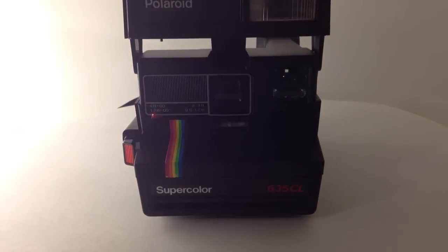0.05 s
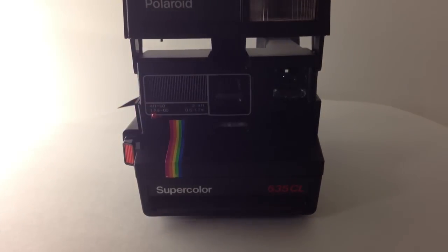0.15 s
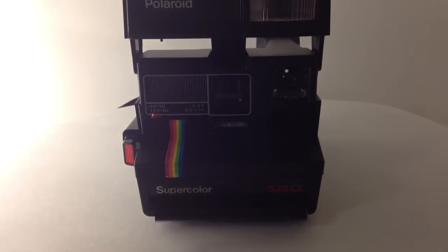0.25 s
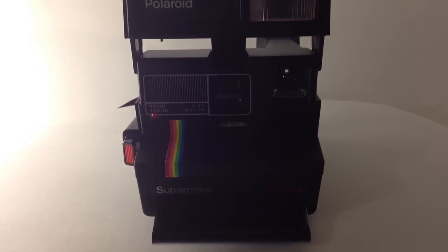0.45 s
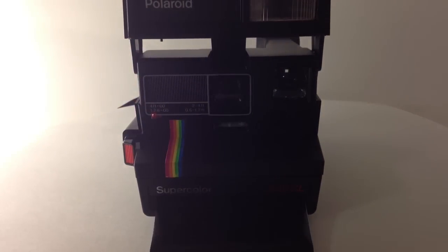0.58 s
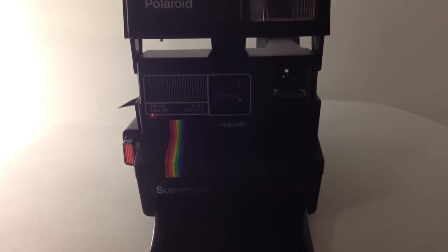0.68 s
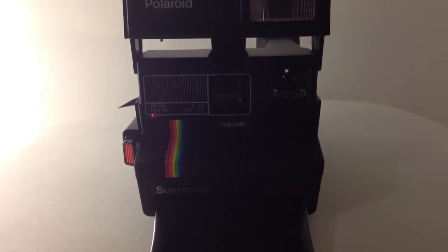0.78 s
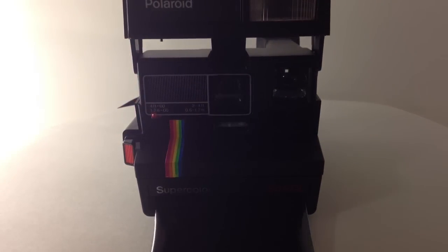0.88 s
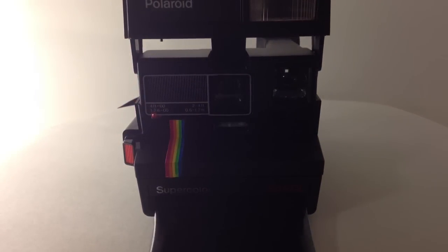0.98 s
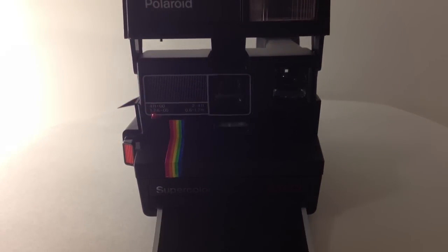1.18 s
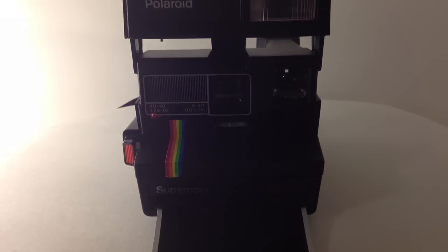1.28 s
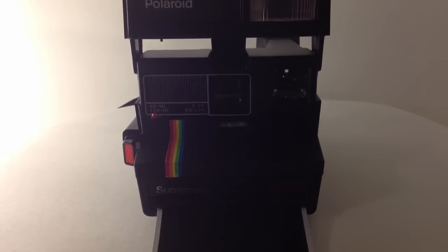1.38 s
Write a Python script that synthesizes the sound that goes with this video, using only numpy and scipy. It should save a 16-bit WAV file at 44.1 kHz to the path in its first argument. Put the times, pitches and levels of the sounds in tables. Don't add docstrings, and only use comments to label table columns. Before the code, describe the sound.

A plastic instant camera's small motor whirs with a gritty, rattling whine as a sheet squeals out through rollers; catches tick, then a sharp hollow clack, and the motor continues more quietly. Close microphone, small quiet room.

```python
import sys
import numpy as np
from scipy import signal
from scipy.fft import rfft, irfft, next_fast_len
from scipy.io import wavfile
from scipy.ndimage import uniform_filter1d, map_coordinates

SR = 44100
rng = np.random.default_rng(int(sys.argv[2]) if len(sys.argv) > 2 else 0)


def ratio_of_db(decibels):
    return 10 ** (np.asarray(decibels, float) / 20)


def pcm_store(signal):
    levels = np.round(np.clip(np.atleast_2d(signal), -1, 1) * 32767)
    wavfile.write(sys.argv[1], SR, levels.astype(np.int16).T)


N = 63945

# (time [s], tooth rate [Hz], rattle level [dB])
MOTOR = [(0, 1992, -37.5), (.07, 1849, -39), (.15, 1800, -40.5), (.175, 2020, -37), (.26, 2115, -38),
         (.37, 2196, -36.5), (.41, 2209, -37.5), (.564, 2201, -37), (.704, 2263, -36.5), (.844, 2327, -37),
         (.894, 2331, -37), (1.008, 2306, -36.5), (1.04, 2291, -35), (1.12, 2305, -34), (1.19, 2281, -33.5),
         (1.27, 2394, -40), (1.36, 2485, -37), (1.45, 2472, -40)]
# (time [s], partial 1 [dB], partial 2 [dB], partial 3 [dB])
WHINE_DB = [(0, -51, -55, -73.5), (.15, -56.5, -60, -59), (.25, -52, -46, -45), (.31, -49, -46, -49),
            (.37, -42, -48, -45), (.45, -53, -44, -50.5), (.56, -55, -42, -40.5), (.6, -56, -45.5, -77),
            (.7, -51, -45, -58), (.8, -53, -41, -66), (.89, -47, -46, -70.5), (1.0, -47, -39, -60),
            (1.045, -44, -50, -62), (1.11, -58, -37, -64), (1.17, -47, -52, -65), (1.3, -65, -85, -72),
            (1.39, -51, -88, -58), (1.45, -79, -69, -52)]
# (time [s], pitch [Hz], level [dB])
ROLLER_HUM = [(0, 470, -68), (.25, 470, -57), (.3, 469.5, -53.5), (.6, 467, -57), (.72, 443.8, -55),
              (1.05, 444.5, -48.5), (1.2, 444, -48), (1.268, 445, -64), (1.285, 456.5, -45.5),
              (1.35, 483, -49.5), (1.42, 460, -57)]
# (multiple [-], level [dB])
ROLLER_PARTIALS = [(1, -2.5), (3, -3)]
# (time [s], pitch [Hz], level [dB])
DRIVE_HUM = [(0, 339.2, -70.5), (.6, 331.7, -64.5), (1.05, 336.1, -58), (1.15, 335, -64), (1.23, 332, -80)]
# (multiple of shaft rate [-], level [dB])
SHAFT_ORDERS = [(4, -60), (6, -55), (7, -54.5), (8, -58), (9, -56), (10, -57)]
# (frequency [Hz], density [dB per Hz])
CASE = [(100, -36), (300, -20), (500, -7.5), (1300, -8.5), (2000, -8), (4500, -5), (7500, -5.5),
        (9800, -16.5),
        (12000, -12), (15300, -19.5)]
# (centre [Hz], width [Hz], boost [dB])
HOLLOWS = [(460, 190, -1.5), (832, 50, 6), (920, 31, 0.5), (1217, 105, 5.5), (3700, 900, 2.5),
           (4550, 420, 1), (6300, 140, 1.5)]
# (time [s], pitch [Hz], level [dB])
SQUEAL = [
    (0, 4030, -40.5),
    (.06, 3650, -48),
    (.14, 3350, -54),
    (.25, 3280, -46.5),
    (.35, 3103, -46),
    (.42, 3055, -46),
    (.47, 3050, -59),
    (.55, 3050, -70),
]
# (time [s], pitch [Hz], level [dB])
GRIP = [
    (.15, 4490, -60),
    (.19, 4450, -47),
    (.33, 4550, -44),
    (.42, 4600, -50),
    (.6, 4600, -86),
]
# (time [s], level [dB], centre [Hz], fade [s])
TICKS = [(.598, -23, 4780, 0.0014), (.599, -27.5, 2510, 0.004), (.6005, -37, 4600, 0.00067),
         (1.0402, -30, 1210, 0.0033), (1.0652, -12.5, 1440, 0.00067), (.716, -29.5, 2820, 0.0044),
         (.718, -29.5, 1010, 0.0014), (1.040, -30, 6100, .002), (1.0425, -24.5, 3514, .002),
         (1.058, -30.5, 2260, 0.0079), (1.0633, -22, 4340, 0.0017), (1.0657, -16, 3600, 0.00053),
         (1.0685, -22, 1250, 0.002), (1.075, -31, 1220, 0.0029), (1.221, -28.5, 1920, 0.0043),
         (1.2225, -29.5, 1160, 0.0055), (1.2205, -27, 11000, 0.0023), (1.2212, -28.5, 5170, 0.0021),
         (1.232, -35.5, 700, 0.0073), (1.357, -36, 3000, 0.0033), (1.419, -36, 1590, 0.0046),
         (1.4195, -34, 7000, .004)]
# (time [s], level [dB], centre [Hz], fade [s])
CLACK = [(1.101, -40, 4160, 0.003), (1.1255, -22.5, 1220, 0.00032), (1.127, -35, 696.7, 0.0027),
         (1.1304, -12, 4430, 0.00029), (1.131, -17, 4100, 0.0012), (1.135, -18, 4300, 0.0021),
         (1.1352, -26, 920, 0.00052), (1.1369, -6.5, 4240, 0.00021), (1.137, -26.5, 4400, 0.011),
         (1.1385, -15, 4280, 0.0034), (1.139, -14, 6040, 0.0004), (1.1383, -18, 12400, 0.005),
         (1.144, -27.5, 12500, 0.017), (1.1408, -13.5, 6700, 0.00051), (1.1425, -21, 5500, 0.0032),
         (1.1455, -20, 4470, 0.0023), (1.1486, -19.5, 4600, 0.0015), (1.1494, -8.5, 3600, 0.00098),
         (1.1493, -12.5, 1900, 0.0004), (1.1527, -13.5, 4400, 0.00049), (1.155, -26, 2360, 0.011),
         (1.1645, -23.5, 685, 0.0055), (1.1715, -29, 790, 0.0043), (1.161, -23.5, 5500, 0.0075)]
# (centre [Hz], level [dB], t60 [s])
SHELL = [(750, 11, 0.09), (1210, 2.5, 0.049), (1435, -1, 0.017), (1900, 0, 0.33), (2380, -26, 0.027),
         (3600, -19, 0.086), (4150, 5, 0.032), (4600, 6, 0.045), (5060, 7, 0.12), (6390, 0, 0.014)]
# (time [s], level [dB], pitch [Hz])
PANEL_RINGS = [(.5985, -28, 2483), (.5985, -26.5, 4685), (1.067, -41, 1210), (1.0646, -28, 455),
               (1.066, -28.5, 570), (1.0665, -33, 758), (1.1252, -29, 548), (1.132, -43, 223),
               (1.15, -36, 210), (1.151, -28.5, 1900), (1.165, -26, 750), (1.171, -36.5, 750),
               (1.1492, -27.5, 1457), (1.222, -44, 204), (1.241, -43, 200)]
# (centre [Hz], width [Hz], gain [dB])
MIC_NOTCH = (10020, 1950, -9)
# (frequency [Hz], t60 [s])
ROOM_T60 = [(200, 0.98), (2000, 0.51), (10000, 0.25)]
# (frequency [Hz], density [dB per Hz])
AIR = [(30, -36), (100, -4), (160, 1.5), (300, -10), (1000, -1.5), (5000, -24), (15000, -45)]
# (frequency [Hz], gain [dB])
BAND_EDGE = [(15250, 0), (15450, -16), (15760, -26), (15800, -110)]

TEETH = 16
GRIPPED_S, ROUGH_LOOSE, ROUGH_GRIPPED = 0.3, 1.1, 0.3


def unit(x):
    return x / np.sqrt(np.mean(np.abs(x) ** 2) + 1e-20)


def along(points, hz):
    f, v = np.transpose(points)
    return np.interp(np.log(hz + 1), np.log(f + 1), v)


def curves(rows):
    s, *cols = np.transpose(rows)
    return [np.interp(np.arange(N) / SR, s, c) for c in cols]


def wobble(rate_hz):
    return map_coordinates(rng.standard_normal(N // 20), [np.arange(N) * rate_hz / SR])


def filtered(x, response):
    m = next_fast_len(len(x) + 8192)
    return irfft(rfft(x, m) * response(np.fft.rfftfreq(m, 1 / SR)), m)[:len(x)]


def peak(f, hz, width_hz):
    return 1j * f * width_hz / (hz * hz - f * f + 1j * f * width_hz)


def tone(hz, db, multiple, flutter_db, rough=0.094, smear_hz=150):
    cycles = multiple * np.cumsum(hz) / SR + 0.074 * wobble(29.28)
    turn = np.exp(2j * np.pi * cycles)
    rough = np.clip(rough, 0, 1)
    noise = wobble(smear_hz) + 1j * wobble(smear_hz)
    shape = np.sqrt(1 - rough) + np.sqrt(rough / 2) * noise
    level = np.sqrt(2) * ratio_of_db(db + flutter_db * wobble(29.47))
    return level * (shape * turn).real


def patchy(x, patch_db):
    z = signal.stft(x, nperseg=512)[2]
    field = uniform_filter1d(rng.standard_normal(z.shape), 5, axis=0)
    field = uniform_filter1d(field, 8, axis=1)
    return signal.istft(z * ratio_of_db(patch_db * unit(field)), nperseg=512)[1][:N]


def rattle():
    jitter_teeth, worn_db, hiss_db, patch_db = 0.3, 1.5, 8, 1.6
    brightens = 0.69
    rate_hz, level_db = curves(MOTOR)
    count = np.cumsum(rate_hz) / SR
    tooth = np.arange(1, int(count[-1]))
    chance = rng.standard_normal((N // 8, 2))
    when = np.interp(tooth + jitter_teeth * chance[tooth, 0], count, np.arange(N)).astype(int)
    wear = ratio_of_db(worn_db * rng.standard_normal(TEETH))
    knocks = np.bincount(when, wear[tooth % TEETH] * chance[tooth, 1], N)
    drive = unit(knocks - knocks.mean()) + ratio_of_db(hiss_db) * rng.standard_normal(N)

    def case(f):
        hollows = [1 + (ratio_of_db(db) - 1) * peak(f, hz, width_hz) for hz, width_hz, db in HOLLOWS]
        return ratio_of_db(along(CASE, f)) * np.prod(hollows, axis=0)

    sound = unit(filtered(patchy(drive, patch_db), case))
    treble = filtered(sound, lambda f: 1 / (1 + (4200 / (f + 1)) ** 4))
    extra = ratio_of_db(brightens * (level_db - np.median(level_db))) - 1
    return ratio_of_db(level_db + 0.77 * wobble(23.35)) * (sound + extra * treble)


def whine():
    loose_db = -1.5
    rate_hz, level_db = curves(MOTOR)
    loose = np.arange(N) / SR < GRIPPED_S
    rough = uniform_filter1d(np.where(loose, ROUGH_LOOSE, ROUGH_GRIPPED), size=2000)
    mesh = sum(tone(rate_hz, db, k + 1, flutter_db=3, rough=rough * (k + 0.5) / 2, smear_hz=302.2)
               for k, db in enumerate(curves(WHINE_DB)))
    swing_db = 2 * np.minimum(level_db - np.median(level_db), 0) + loose_db * loose
    shaft = sum(tone(rate_hz / TEETH, db + swing_db + 2 * wobble(5.03), k, 0.75, 0.17, 40.07)
                for k, db in SHAFT_ORDERS)
    return mesh + shaft


def hums():
    roll_hz, roll_db = curves(ROLLER_HUM)
    drive_hz, drive_db = curves(DRIVE_HUM)
    rollers = sum(tone(roll_hz, roll_db + db, k, flutter_db=1.5, rough=0.15 * k, smear_hz=69.84)
                  for k, db in ROLLER_PARTIALS)
    return rollers + tone(drive_hz, drive_db, 1, flutter_db=1.0, smear_hz=50.8)


def scrape():
    squeal_hz, squeal_db = curves(SQUEAL)
    grip_hz, grip_db = curves(GRIP)
    rough = np.interp(np.arange(N) / SR, [.2, .25, .3, .36, .4], [.8, .4, 1, 1, .05])
    squeal = tone(squeal_hz, squeal_db, 1, flutter_db=3, rough=rough, smear_hz=350)
    return squeal + tone(grip_hz, grip_db, 1, flutter_db=3, rough=1, smear_hz=400)


def cracks(rows):
    attack_s, first_blow, breadth = 0.0002, 2.5, 1.1
    ring_db, ring_spread_db = -11.5 + 6.5, 3.2
    out, t = np.zeros(N + SR), np.arange(SR // 10) / SR
    for s, db, hz, fade_s in rows:
        burst = rng.standard_normal(len(t)) * np.exp(-t / fade_s) * (1 - np.exp(-t / attack_s))
        burst[round(attack_s * SR)] += first_blow
        crack = filtered(burst, lambda f: peak(f, hz, breadth * hz) ** 2)
        crack = crack / np.sqrt(np.sum(crack ** 2) / (fade_s * SR / 2))
        spread_db = rng.normal(0, ring_spread_db, len(SHELL))

        def shell(f):
            return sum(ratio_of_db(mode_db + v) * peak(f, mode_hz, np.log(1000) / np.pi / t60_s)
                       for (mode_hz, mode_db, t60_s), v in zip(SHELL, spread_db))

        out[round(s * SR):][:len(t)] += ratio_of_db(db) * (crack + ratio_of_db(ring_db) * filtered(crack, shell))
    return out[:N]


def catches_and_guard():
    hz, width_hz, db = MIC_NOTCH

    def microphone(f):
        return (1 + (ratio_of_db(db) - 1) * peak(f, hz, width_hz)) * (f / (f - 296j)) ** 2

    return filtered(cracks(TICKS) + cracks(CLACK), microphone)


def thump():
    start_s, fade_s, level_db = 1.14, 0.008, -42
    u = np.maximum(np.arange(N) / SR - start_s, 0) / fade_s
    return ratio_of_db(level_db) * u * (2 - u) * np.exp(-u)


def panels():
    fade_s, from_hz = 0.0075, 150
    out = np.zeros(N)
    for s, db, hz in PANEL_RINGS:
        since_s = np.maximum(np.arange(N) / SR - s, 0)
        out += ratio_of_db(db) * np.sin(2 * np.pi * hz * since_s) * np.exp(-since_s / fade_s)
    return filtered(out, lambda f: (f / (f - 1j * from_hz)) ** 3)


def room(x):
    level_db, delay = -14, 150
    hz, t, z = signal.stft(rng.standard_normal(SR // 2), SR, nperseg=256)
    decay = ratio_of_db(-60 * t / along(ROOM_T60, hz)[:, None])
    tail = signal.istft(z * decay, SR, nperseg=256)[1]
    return ratio_of_db(level_db) * signal.fftconvolve(np.pad(x, (delay, 0)), tail / np.linalg.norm(tail))[:N]


def still_air():
    level_db = -60
    return ratio_of_db(level_db) * unit(filtered(rng.standard_normal(N), lambda f: ratio_of_db(along(AIR, f))))


def scene():
    hits = catches_and_guard()
    camera = rattle() + whine() + hums() + scrape() + hits + thump() + panels()
    return (camera + room(hits) + still_air())[None]


def low_pass(x):
    return signal.sosfilt(signal.butter(12, 15730, fs=SR, output="sos"), x)


def record(dry):
    duck_s, fall_s, duck_db, recover_db_per_s = 1.15, 0.029, 11, 4.5
    since_s = np.maximum(np.arange(N) / SR - duck_s, 0)
    gain_db = -duck_db * (1 - np.exp(-since_s / fall_s)) + recover_db_per_s * since_s

    def band(f):
        return (f / (f - 120j)) ** 2 * ratio_of_db(along(BAND_EDGE, f))

    mix = filtered(dry[0] * ratio_of_db(gain_db), band)[None]
    return low_pass(mix)


dry = scene()
out = record(dry)
pcm_store(out)
```